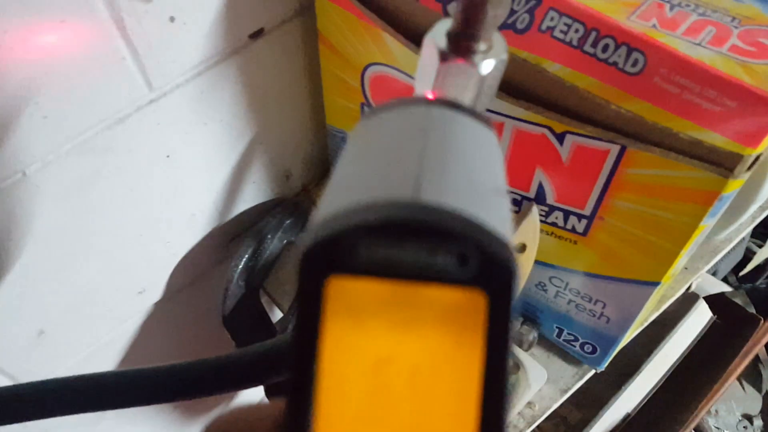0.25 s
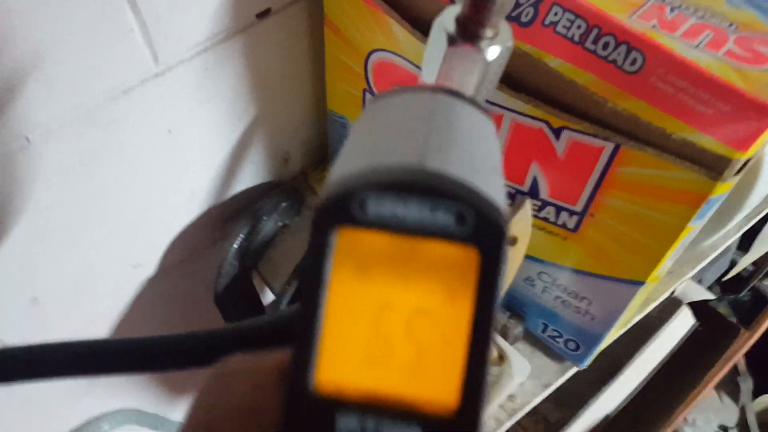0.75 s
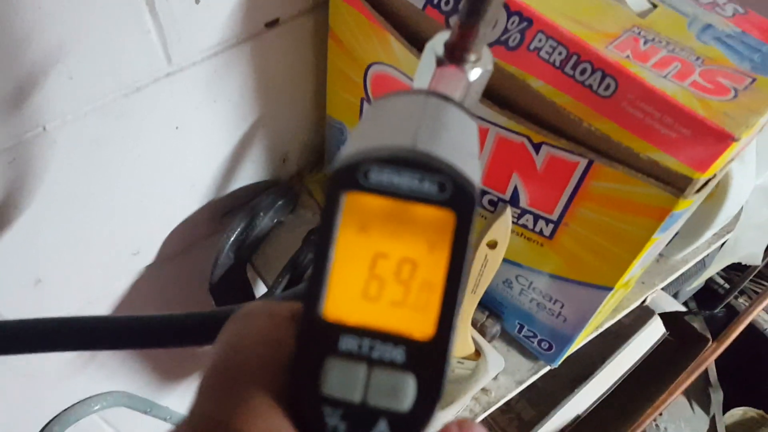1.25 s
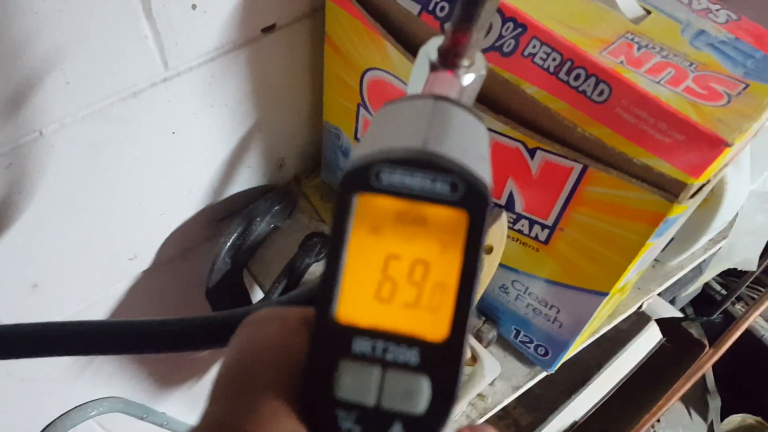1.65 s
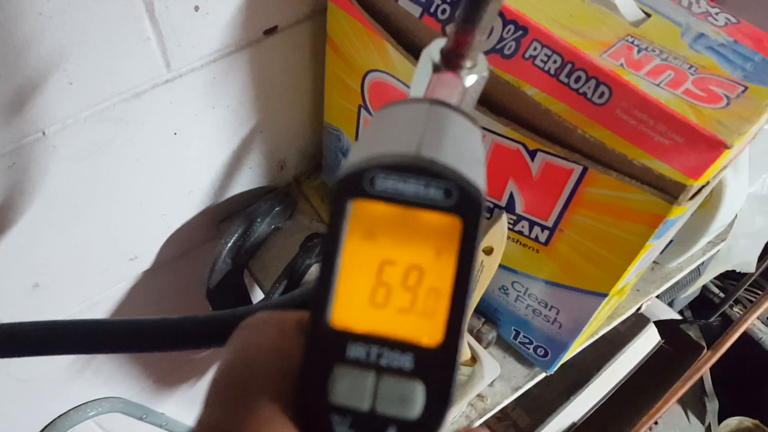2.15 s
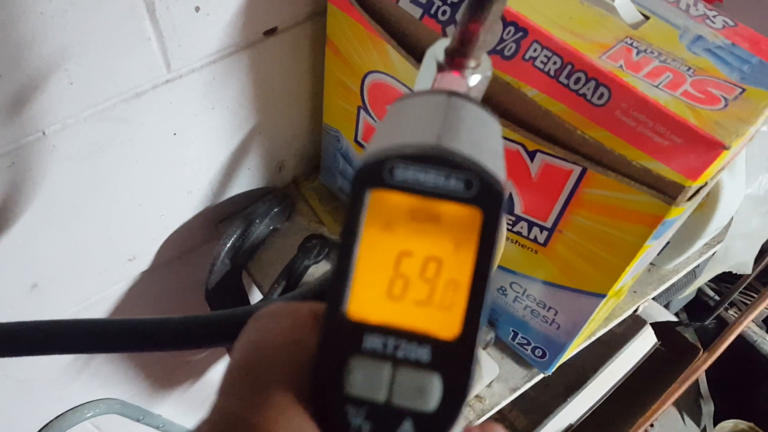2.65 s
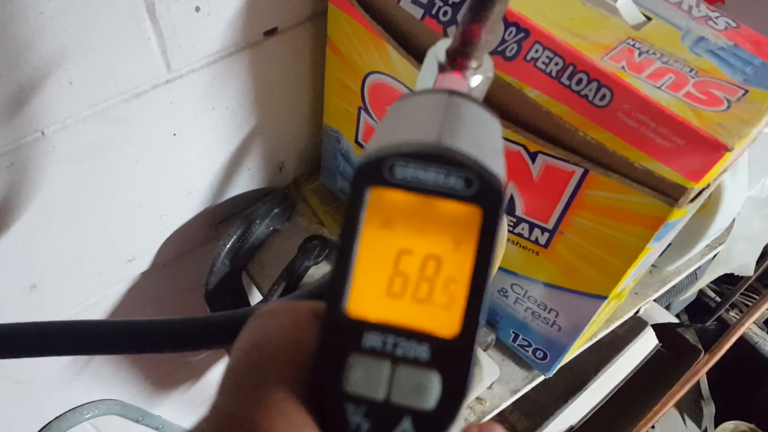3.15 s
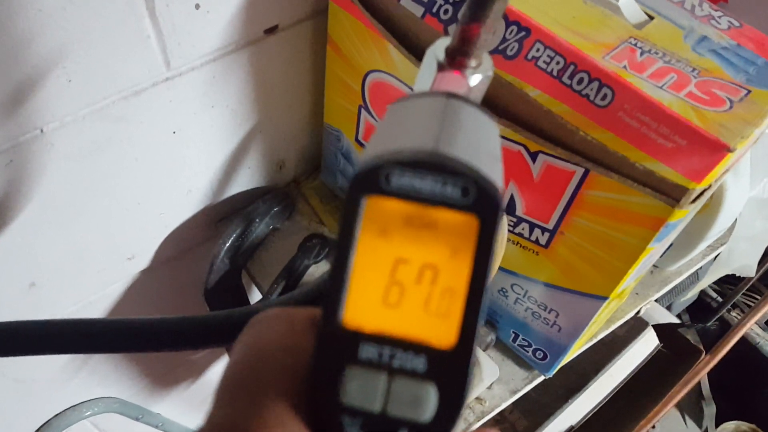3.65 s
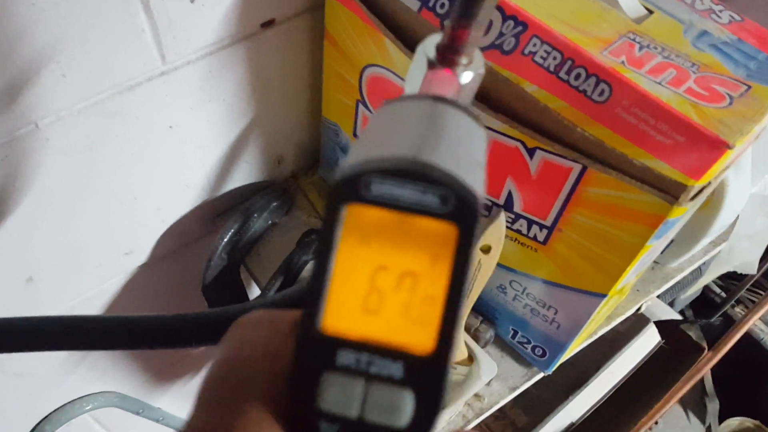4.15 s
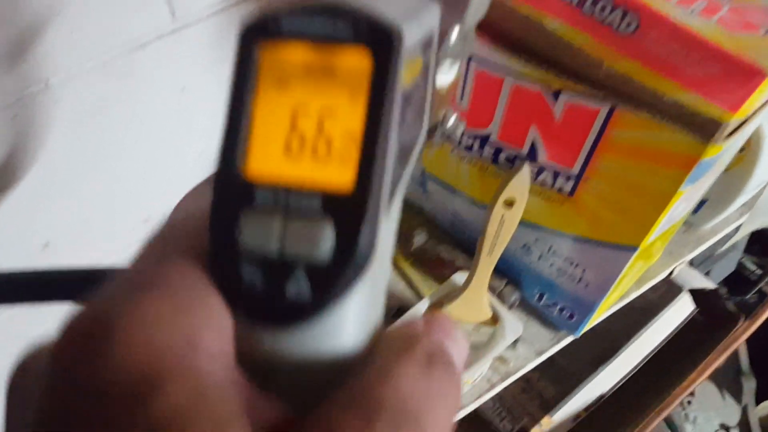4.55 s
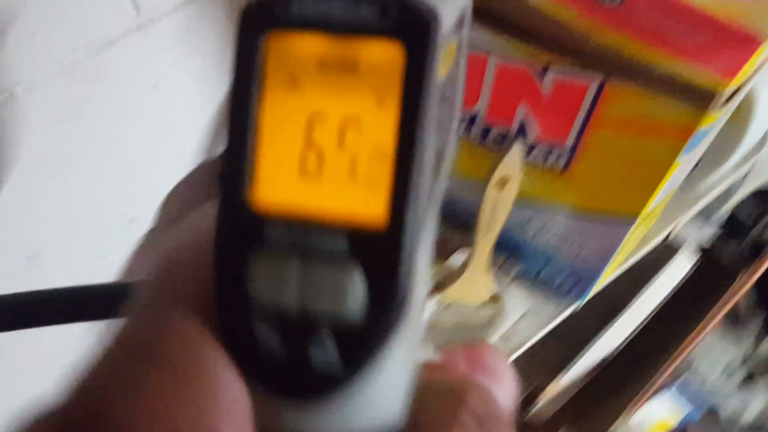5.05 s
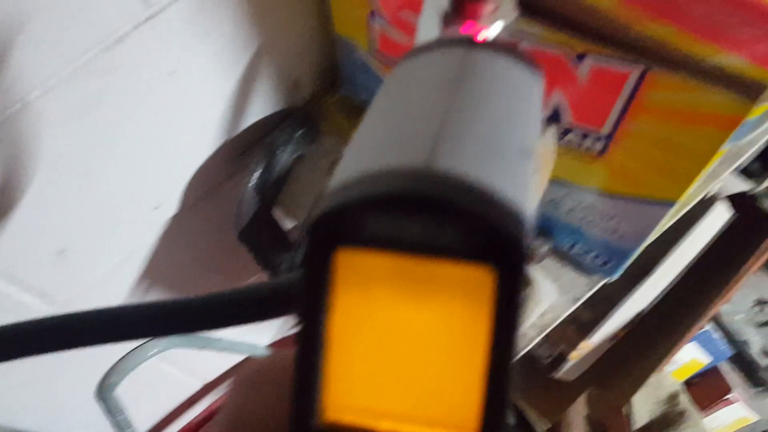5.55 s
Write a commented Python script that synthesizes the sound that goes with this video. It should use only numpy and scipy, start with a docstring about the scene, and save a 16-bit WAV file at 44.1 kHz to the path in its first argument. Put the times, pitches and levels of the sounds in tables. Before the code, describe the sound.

A belt-driven air compressor runs steadily at close range in a garage, droning and clattering in a rapid low pulse with hissing valves.

```python
"""A belt-driven two-cylinder air compressor runs steadily in a garage, a few metres away.
Its pump drones as sines on multiples of the crank speed, and the motor hums as sines against it.
The reed valves clatter and hiss as shaped noise that bumps at fixed crank angles, over a rumble,
and whistle faintly as wavering tones. Two hand-held microphones turn and drift, and hear it left first."""
import sys
import numpy as np
from scipy import signal
from scipy.fft import rfft, irfft, next_fast_len
from scipy.io import wavfile

SR = 44100
rng = np.random.default_rng(int(sys.argv[2]) if len(sys.argv) > 2 else 0)


def generate_wav(signal):
    """Clip the signal to [-1, 1] and save it as 16-bit WAV at the path in sys.argv[1]."""
    frames = np.transpose(np.atleast_2d(signal))
    scaled = np.clip(frames, -1, 1) * 32767
    pcm = np.round(scaled).astype(np.int16)
    wavfile.write(sys.argv[1], SR, pcm)


N = 255383
SIZE = next_fast_len(N)  # working length, trimmed to N at the end
T = np.arange(SIZE) / SR
HZ = np.fft.rfftfreq(SIZE, 1 / SR)

CRANK_HZ, BELT_HZ, MOTOR_HZ, MAINS_HZ = 16.0995, 3.55, 58.58, 119.93
IN_STEP_S = 0.069  # moment at which the motor and the fourth crank order are in phase
ORDERS = np.arange(2, 66 + 1)  # multiples of the crank speed in the drone
EDGE_HZ = 15800  # upper band edge


# Phase pattern of each group of orders: (first order [multiple], crank angle [turns],
# delay of each next order [turns], lag of odd orders [cycles])
ORDER_DELAYS = [(2, .57, .055, .3125), (13, .26, .23, .3125), (29, .67, -.25, .5), (42, .87, -.0675, .375),
                (53, .92, .015, .375)]


def order_phases():
    """Start phases [cycles] that spread each group over the crank turn, each next order later by a set step."""
    group = np.searchsorted([row[0] for row in ORDER_DELAYS], ORDERS + .5) - 1
    first, angle, delay, odd_lag = np.transpose(ORDER_DELAYS)[:, group]
    start = rng.random(len(ORDER_DELAYS))[group]
    sweep = delay * (ORDERS - first) ** 2 / 2
    return start - angle * ORDERS - sweep - odd_lag * (ORDERS % 2)


# Pump orders, joined by straight lines: (order [multiple], level of every fourth order [dB rms],
# level of the other even orders [dB rms], level of the odd orders [dB rms])
PUMP_ORDERS = [(2, -53, -70, -74), (6, -45, -58, -73), (8, -41, -61, -68), (11, -45, -64, -70),
               (13, -45, -47, -54), (16, -33, -41, -49), (19, -34, -37.5, -45), (23, -43, -50, -49),
               (27, -57, -64, -67), (32, -49, -53, -60), (36, -42.5, -46, -55), (39, -41, -37, -55),
               (45, -47, -50, -50), (48, -41, -53, -47), (51, -57, -57, -59), (60, -62, -54, -56),
               (66, -53, -56, -57)]
# Orders that a panel or pipe lifts above their neighbours: (order [multiple], level [dB rms])
LIFTED_ORDERS = [(19, -33.5), (21, -39.5), (25, -47), (31, -52), (35, -48.5), (39, -45), (43, -37),
                 (47, -44), (56, -52), (57, -46), (59, -40), (61, -50)]
# Part of the drone whose level changes as the microphones move: (bottom [Hz], top [Hz])
BOOM_BAND = (750, 800)


def pump_drone(boom_db, phases, sway):
    """Sines on the crank orders; the seam of the belt swells them a little on each pass."""
    at, *kinds = np.transpose(PUMP_ORDERS)
    fourth_db, even_db, odd_db = (np.interp(ORDERS, at, kind) for kind in kinds)
    db = np.where(ORDERS % 2 == 0, even_db, odd_db)
    db = np.where(ORDERS % 4 == 0, fourth_db, db)
    for lifted, lifted_db in LIFTED_ORDERS:
        db[ORDERS == lifted] = lifted_db
    hz = ORDERS * CRANK_HZ
    in_boom = (hz > BOOM_BAND[0]) & (hz < BOOM_BAND[1])
    rest = tones(hz[~in_boom], db[~in_boom], phases[~in_boom], sway, scatter=.6)
    boom = tones(hz[in_boom], db[in_boom], phases[in_boom], sway, scatter=.6)
    belt = 1 + 0.048 * np.cos(2 * np.pi * BELT_HZ * T)
    return belt * (rest + amp(boom_db) * boom)


# Tones where motor, mains and belt mix with the crank: (crank [multiple], motor [multiple],
# mains [multiple], belt [multiple], level [dB rms])
MOTOR_TONES = [(0, 1, 0, 0, -49), (0, 3, 0, 0, -59), (0, 16, 0, 0, -54), (0, 0, 1, 0, -57),
               (0, 0, 2, 0, -45), (0, 0, 3, 0, -44), (8, 0, 1, 0, -47), (12, 1, 0, 0, -53),
               (42, 1, 0, 0, -55), (43, 1, 0, 0, -48), (48, -1, 0, 0, -52), (6, 0, 0, 1, -59),
               (14, 0, 0, 1, -56), (44, 0, 0, -1, -53), (11, 0, 0, -3, -59), (19, 0, 0, 1, -53),
               (19, 0, 0, -2, -55), (46, 0, 0, -3, -55)]


def motor_hum(fourth_order_phase, sway):
    """Sines on sums and differences of the four speeds; the first beats against crank order four."""
    table = np.array(MOTOR_TONES)
    hz = table[:, :4] @ [CRANK_HZ, MOTOR_HZ, MAINS_HZ, BELT_HZ]
    phases = rng.random(len(table))
    phases[0] = fourth_order_phase + (4 * CRANK_HZ - MOTOR_HZ) * IN_STEP_S
    return tones(hz, table[:, 4], phases, sway, scatter=0.23)


# Knocks within one turn: (crank angle [turns], spread [turns], strength in power [0-1])
KNOCK_STROKES = [(.13, 0.099, 1), (.25, 0.042, 1), (.52, 0.021, 1), (.64, 0.071, 0.85), (.77, 0.22, 0.24),
                 (.88, 0.053, 0.9)]
# Bright noise of the valves: (frequency [Hz], level [dB per Hz])
CLATTER_SPECTRUM = [(700, -115), (1150, -66.5), (1300, -64), (1800, -66), (2120, -70), (2400, -65),
                    (2650, -63.5), (2900, -65), (3050, -69.5), (3600, -67), (4200, -70), (4800, -71),
                    (6000, -67), (9000, -110)]


def valve_clatter(level_db):
    """Bright noise that the knocks push up, unevenly, over a strong steady base."""
    power = strokes(KNOCK_STROKES, base=0.97, uneven_half_db=4.0)
    return noise(CLATTER_SPECTRUM, power, alike=0.31) * amp(level_db)


# Puffs within one turn: (crank angle [turns], spread [turns], strength in power [0-1])
PUFF_STROKES = [(.27, 0.059, 0.99), (.45, 0.032, 0.47), (.79, 0.053, 0.33), (.92, 0.2, 0.36)]
# Airy noise of the valves: (frequency [Hz], level [dB per Hz])
HISS_SPECTRUM = [(2500, -115), (4500, -79.5), (5800, -74.5), (7000, -68), (7900, -68.5), (8500, -69.5),
                 (9300, -70), (9800, -73.5), (10250, -77.5), (10800, -75.5), (12000, -76.5), (13500, -74),
                 (14500, -78), (15500, -74.5), (16500, -76)]


def valve_hiss():
    """High noise that swells with each puff; about half of its power repeats from turn to turn."""
    power = strokes(PUFF_STROKES, base=0.2, uneven_half_db=1.3)
    return noise(HISS_SPECTRUM, power, alike=0.55)


# Whistling of reeds and ports: (frequency [Hz], unsteadiness [Hz], level at zero turn [dB rms],
# share from the second cylinder [0-1], left minus right [dB],
# gain turned one way [dB per unit of turn], gain turned the other way [dB per unit of turn])
WHISTLES = [(1975, 12, -45, .5, 0, -5, -6), (2280, 25, -45.5, .5, -1, 0, -8),
            (2450, 25, -41.5, .4, -2, -4, -9), (2680, 90, -40, .45, -3, 0, -12),
            (2850, 25, -44, .3, -4, 1, -4), (4520, 20, -48, .5, -3, -7, -4), (5930, 60, -48, .5, 0, 3, 3),
            (6580, 30, -46, .8, 0, -1, 1), (7330, 25, -46, .1, -1, -4, 1),
            (7570, 15, -45.5, .2, -2, -4, -1), (8125, 18, -38, .98, 0, -7, -7),
            (8420, 35, -39.5, .93, 2, 0, -3), (8750, 35, -42, .8, 2, 1, 4), (9080, 22, -44, .4, 3, 1, 7),
            (11280, 20, -48.5, .5, 4, -5, -1), (13500, 20, -52, .7, -4, 0, -3),
            (15500, 60, -48, .8, 2, 0, -2)]


def valve_whistles(aim):
    """Wavering tones that sound while air passes the valves of either cylinder."""
    first = strokes([(.29, 0.11, 0.88)], base=0.049, uneven_half_db=6.0)
    second = strokes([(.8, 0.11, 0.87), (.91, 0.051, 0.68)], base=0.027, uneven_half_db=0.5)
    first, second = first / first.mean(), second / second.mean()
    wander = amp(.5 * drift(1.5, count=5))
    out = np.zeros((2, SIZE))
    for k, (hz, waver_hz, db, share, pan_db, one_db, other_db) in enumerate(WHISTLES):
        flow = np.sqrt((1 - share) * first + share * second)
        # the phase walks at random, one step per 64 samples
        step = np.sqrt(2 * np.pi * waver_hz * 64 / SR)
        walk = np.cumsum(rng.standard_normal(SIZE // 64 + 2)) * step
        phase = 2 * np.pi * hz * T + np.interp(np.arange(SIZE) / 64, np.arange(len(walk)), walk)
        aim_db = one_db * np.maximum(-aim, 0) + other_db * np.maximum(aim, 0)
        level = np.sqrt(2) * amp(db + aim_db) * wander[k % 5] * flow
        out[0] += amp(pan_db / 2) * level * np.sin(phase)
        out[1] += amp(-pan_db / 2) * level * np.cos(phase + .3 * rng.standard_normal())
    return out


# Low noise under the knocks: (frequency [Hz], level [dB per Hz])
RUMBLE_SPECTRUM = [(42, -87), (75, -79), (130, -75), (165, -74), (215, -71), (250, -63), (300, -63.5),
                   (380, -63), (460, -70), (560, -64.5), (660, -64), (710, -59.5), (760, -63), (870, -71),
                   (940, -65), (1100, -75), (1500, -110)]


def rumble():
    """Low noise that swells with the knocks and hardly repeats from turn to turn."""
    power = strokes(KNOCK_STROKES, base=0.43, uneven_half_db=1.5)
    return noise(RUMBLE_SPECTRUM, power, alike=0.021)


def amp(db):
    """Decibels to amplitude factor."""
    return 10 ** (np.asarray(db) / 20)


def evened(x):
    """Scales to rms 1."""
    return x / np.sqrt(np.mean(abs(x) ** 2) + 1e-20)


def read(points, hz, axis=1):
    """One column of a table, joined on a log-frequency axis."""
    table = np.transpose(points)
    return np.interp(np.log(hz + 1), np.log(table[0] + 1), table[axis])


def drift(top_hz, count):
    """Slow chance, one row each, rms 1 over all rows: twenty sines, stronger towards the slow end."""
    hz, t = np.geomspace(top_hz / 20, top_hz, 20), T[::512]
    cycles = hz * t[:, None, None] + rng.random((count, 20))
    slow = (np.sin(2 * np.pi * cycles) / np.sqrt(hz)).sum(2)
    return np.array([np.interp(T, t, row) for row in evened(slow).T])


def strokes(rows, base, uneven_half_db):
    """Power envelope of uneven bumps at fixed crank angles over a base; chance is in half decibels."""
    turns, power = CRANK_HZ * T, base
    for angle, spread, strength in rows:
        turn = np.round(turns - angle)
        sizes = amp(uneven_half_db * rng.standard_normal(round(turns[-1]) + 3))
        size = sizes[turn.astype(int) + 1]
        bump = np.exp(-.5 * ((turns - angle - turn) / spread) ** 2)
        power = power + strength * size * bump
    return power


def turning(alike, change_s):
    """Two rows of white noise; a share of the power repeats every turn, blending among three patterns."""
    place = np.round(CRANK_HZ * T % 1 * SR / CRANK_HZ).astype(int)
    patterns = rng.standard_normal((2, 3, place.max() + 1))[..., place]
    shift = np.arange(3)[:, None]
    fade = np.sqrt(2 / 3) * np.cos(np.pi * (T / change_s + shift) / 3)  # squares sum to one
    repeating = (patterns * fade).sum(1)
    fresh = rng.standard_normal((2, SIZE))
    return np.sqrt(alike) * repeating + np.sqrt(1 - alike) * fresh


# Microphone pair: (frequency [Hz], left-right likeness [0-1], lead of the left [ms],
# left minus right [dB])
MICROPHONE_PAIR = [(60, 1, 0.54, -1), (327, 0.72, 0.16, 0.6), (483, 0.83, 0.25, 0.2), (923, 1, 0.14, 2),
                   (1177, 0.62, 0.28, -2), (2070, 0.98, 0.42, 1.5), (2620, 0.9, 0.38, -4),
                   (4000, 0.38, 0.413, -2), (4900, 0.067, 0.5, -5), (6400, 0.19, 0.39, 2),
                   (8000, 0.09, 0.444, -2.5), (9700, 0.17, 0.33, 8.5), (12500, 0.22, 0.39, -5),
                   (15000, .1, 0.42, -1)]


def pair_at(hz):
    """Likeness, lag of the right microphone [radians] and left minus right [dB] at each frequency."""
    lag = 2 * np.pi * hz * read(MICROPHONE_PAIR, hz, axis=2) / 1000
    return read(MICROPHONE_PAIR, hz), lag, read(MICROPHONE_PAIR, hz, axis=3)


def noise(spectrum, power, alike):
    """Noise with a level per Hz under an envelope, at both microphones: partly the same, the right late."""
    a, b = rfft(evened(np.sqrt(power)) * turning(alike, change_s=1.48))
    same, lag, balance_db = pair_at(HZ)
    side = amp(balance_db / 2)
    left = a * side
    right = (same * np.exp(-1j * lag) * a + np.sqrt(1 - same ** 2) * b) / side
    return irfft(np.array([left, right]) * amp(read(spectrum, HZ)) * np.sqrt(SR / 2), SIZE)


def tones(hz, db, phases, sway, scatter):
    """Sines at both microphones; reflections scatter each balance and delay, more where likeness is low."""
    t = T[::4]  # low tones only, so a quarter of the rate is enough
    out = np.zeros((2, len(t)))
    same, lag, balance_db = pair_at(hz)
    odd = rng.standard_normal((len(hz), 2)) * scatter * (1 - same)[:, None]
    side = amp((balance_db + 8 * odd[:, 0]) / 2)
    lag = lag + odd[:, 1]
    for k in range(len(hz)):
        level = np.sqrt(2) * amp(db[k]) * sway[k % len(sway), ::4]
        z = level * np.exp(2j * np.pi * (hz[k] * t + phases[k]))
        out[0] += side[k] * z.real
        out[1] += (z * np.exp(-1j * lag[k])).real / side[k]
    return signal.resample_poly(out, 4, 1, axis=1)[:, :SIZE]


# The microphones drift and turn: (time [s], turn [units, negative one way, positive the other],
# clatter gain [dB], gain of the drone within the boom band [dB])
MICROPHONE_AIM = [(0, -1.3, -0.5, 3), (.5, -1.5, -0.5, 3), (.85, -1.1, 0, 1), (1.2, 0.23, -0.5, 0.5),
                  (4, .1, 0, -1), (4.4, 0.5, 0, 1.5), (4.75, -0.25, 0, 4.5), (5.15, 0.052, 0.5, 4),
                  (5.35, .8, -1, 3), (5.8, 1.3, -1, -0.5)]


def scene():
    """Sums pump, motor, valves and rumble while the microphones turn."""
    s, *columns = np.transpose(MICROPHONE_AIM)
    aim, clatter_db, boom_db = (np.interp(T, s, column) for column in columns)
    phases = order_phases()
    sway = amp(0.2 * drift(4.2, count=12))
    machine = pump_drone(boom_db, phases, sway) + motor_hum(phases[ORDERS == 4][0], sway[::-1])
    valves = valve_clatter(clatter_db) + valve_hiss() + valve_whistles(aim)
    return (machine + valves + rumble())[:, :N]


def record(dry):
    """A steep low-pass closes the band at its upper edge."""
    lowpass = signal.firwin(1023, EDGE_HZ, window=("kaiser", 9), fs=SR)
    return signal.oaconvolve(dry, lowpass[None], "same")


dry = scene()
out = record(dry)
generate_wav(out)
```